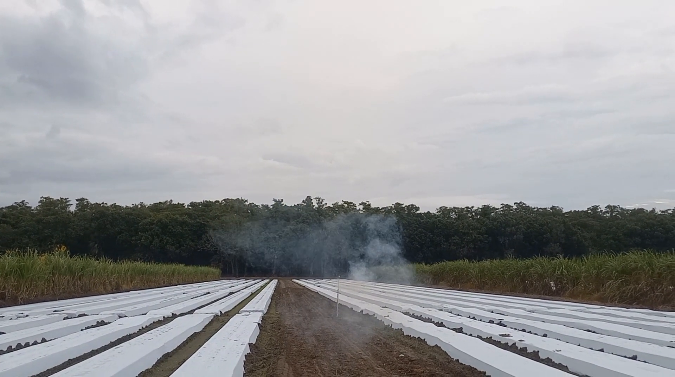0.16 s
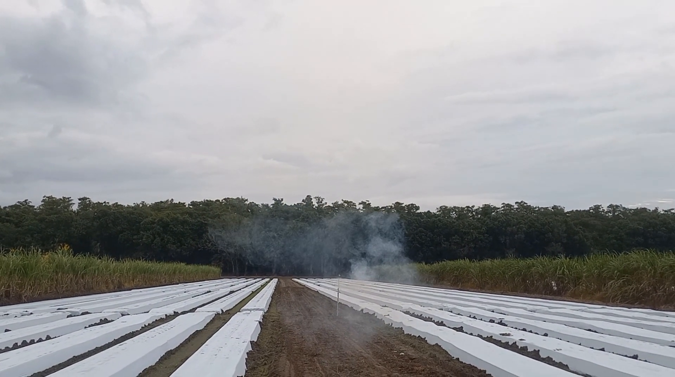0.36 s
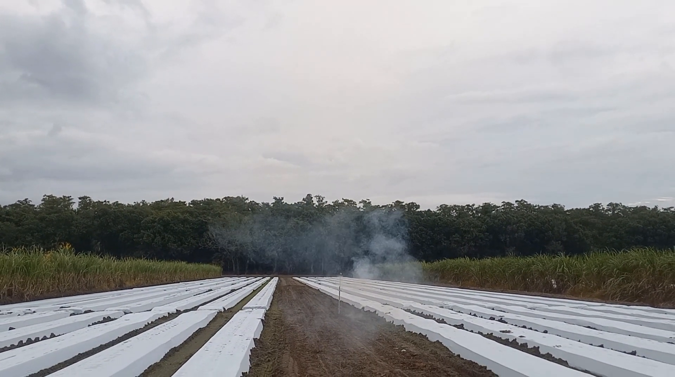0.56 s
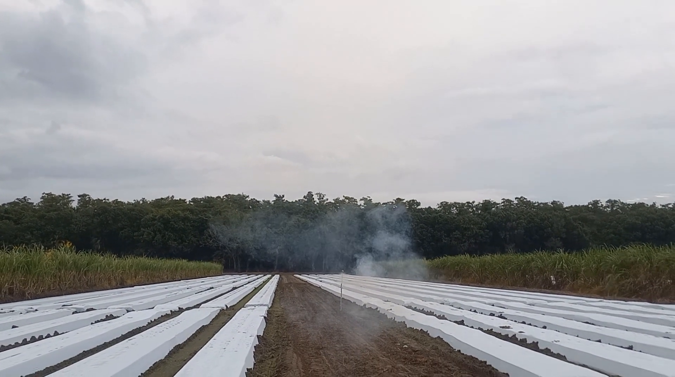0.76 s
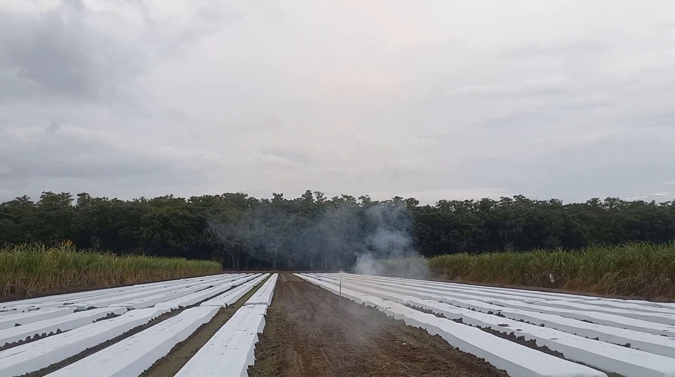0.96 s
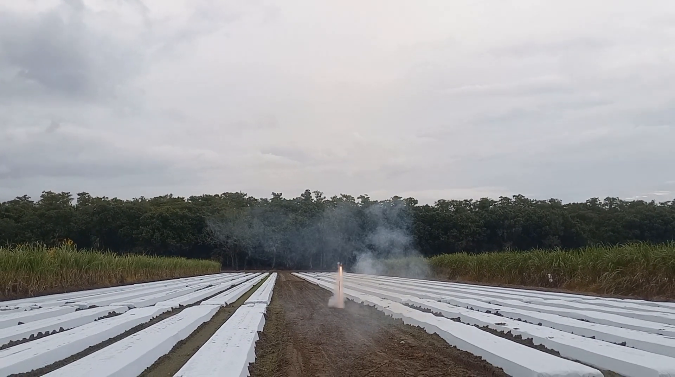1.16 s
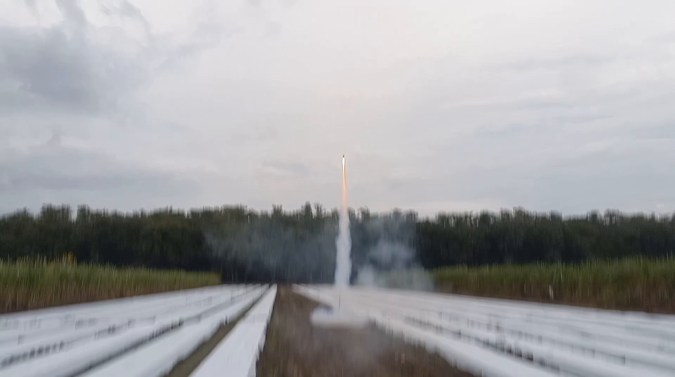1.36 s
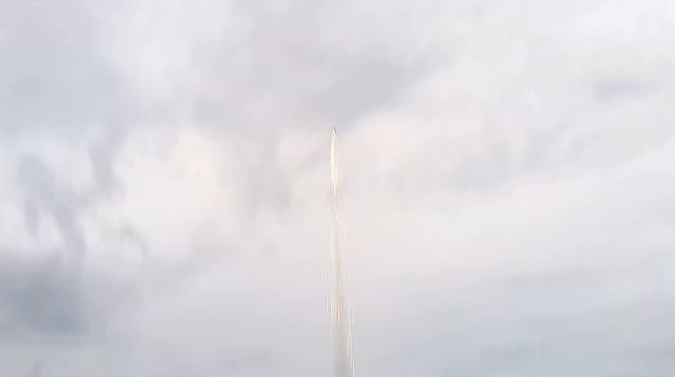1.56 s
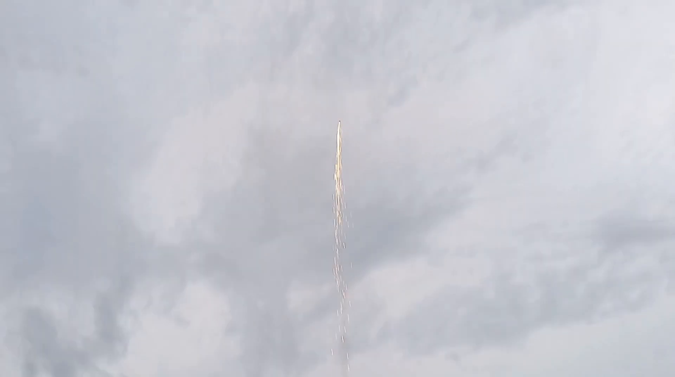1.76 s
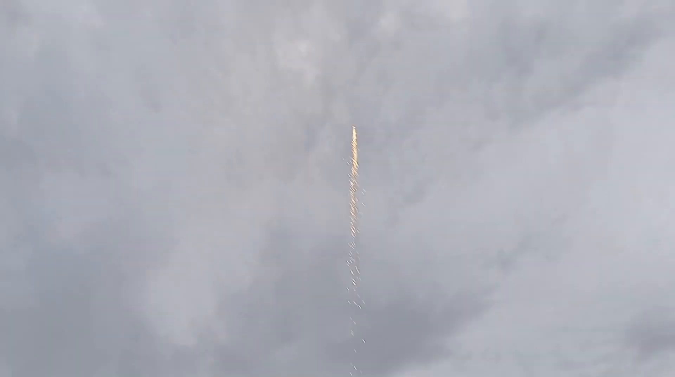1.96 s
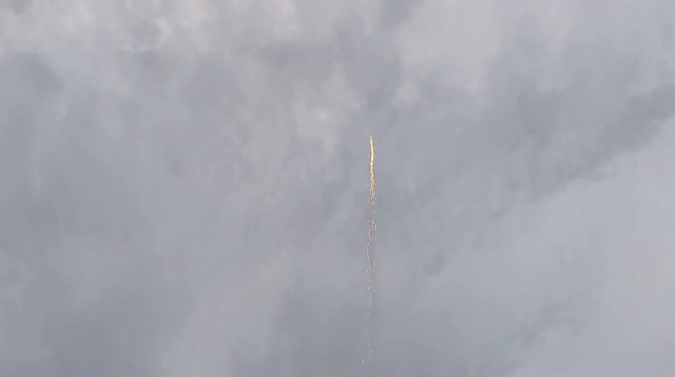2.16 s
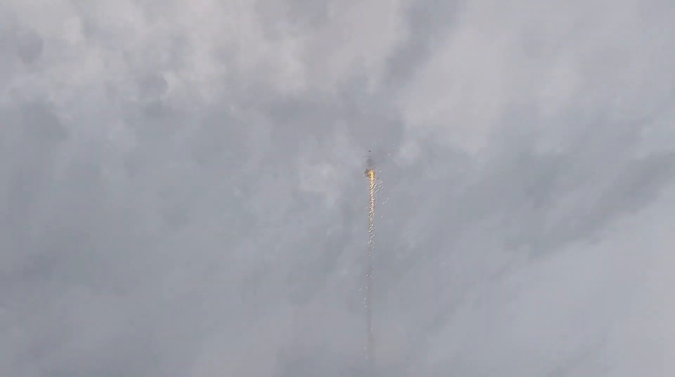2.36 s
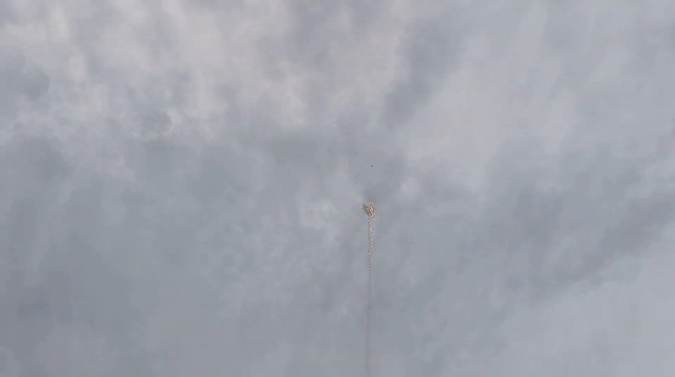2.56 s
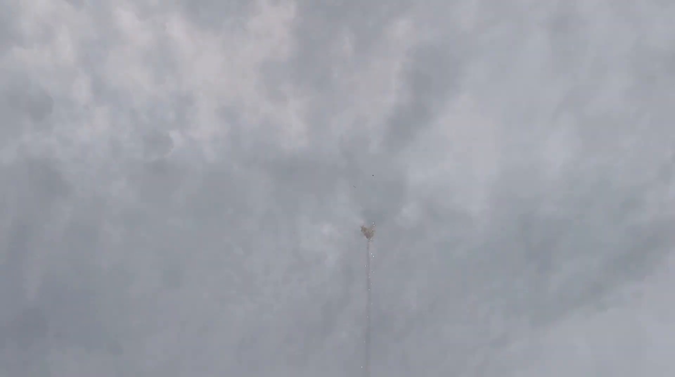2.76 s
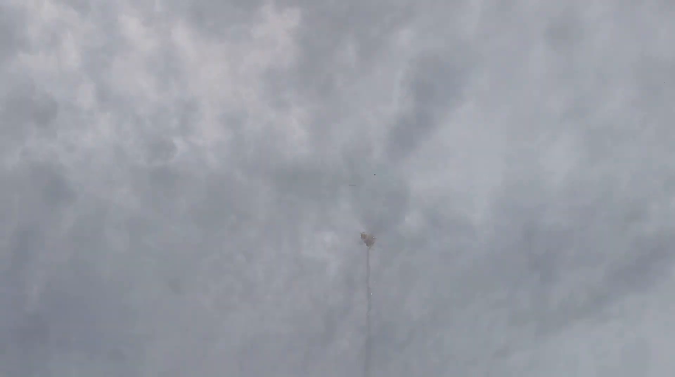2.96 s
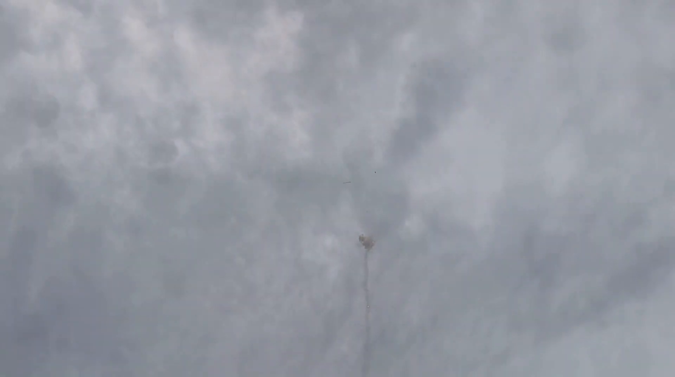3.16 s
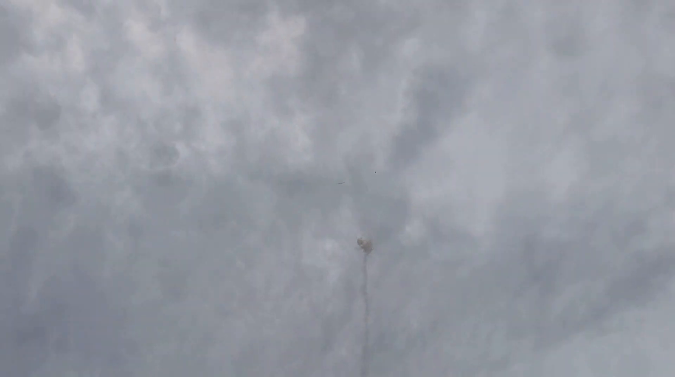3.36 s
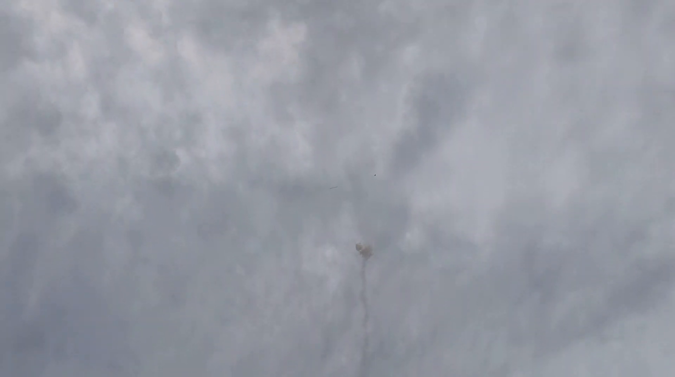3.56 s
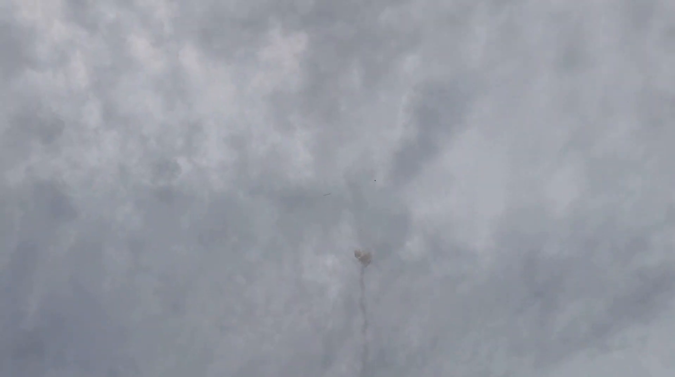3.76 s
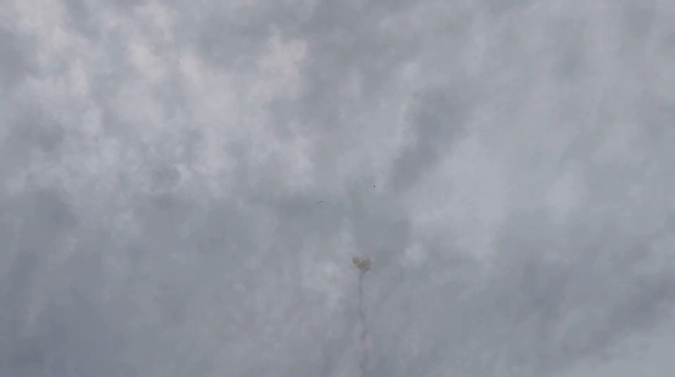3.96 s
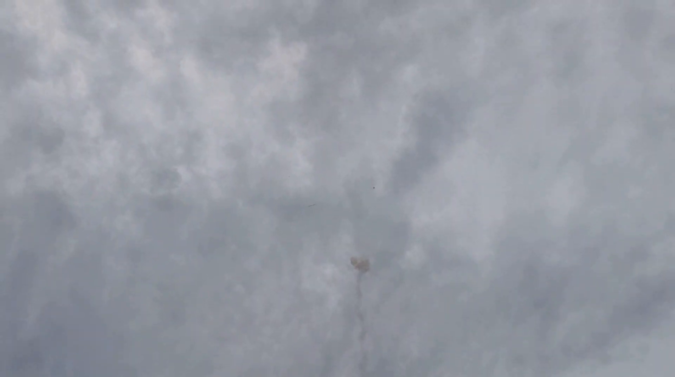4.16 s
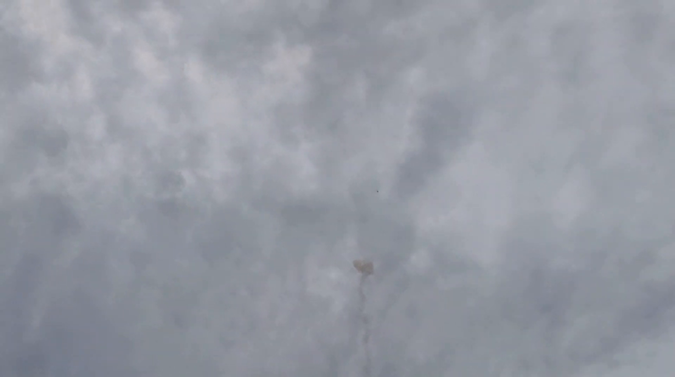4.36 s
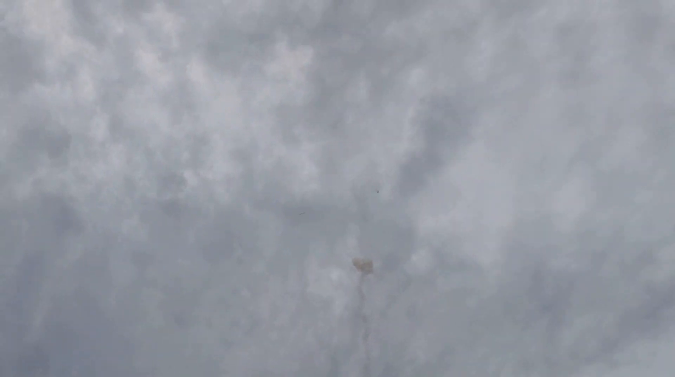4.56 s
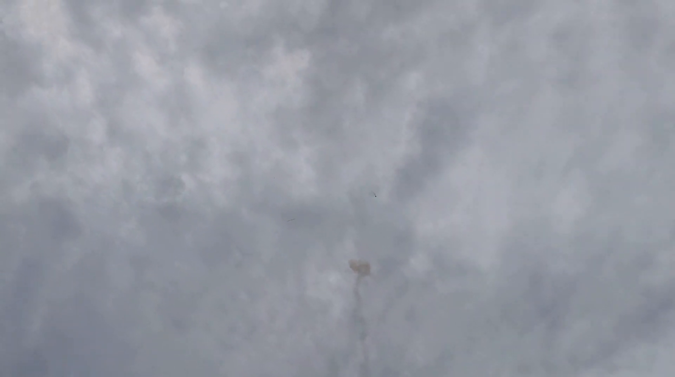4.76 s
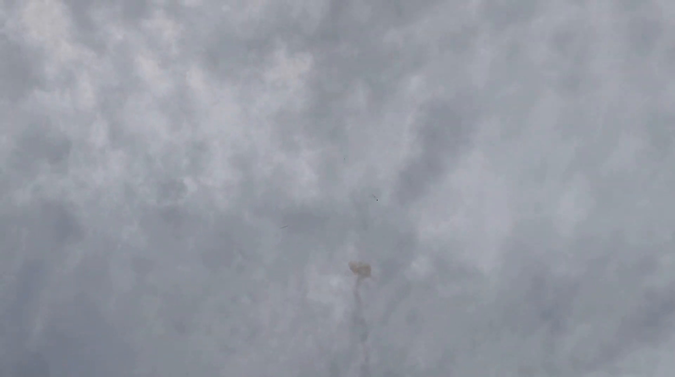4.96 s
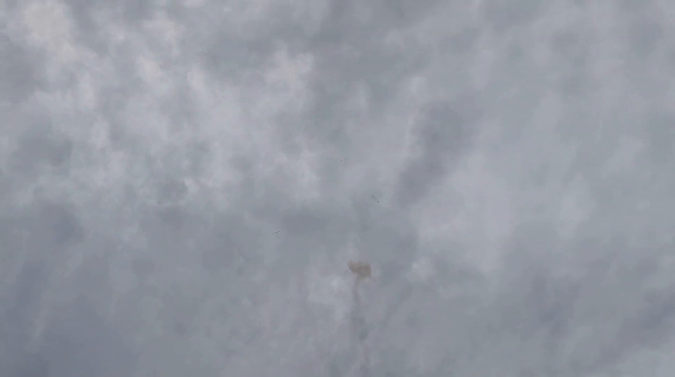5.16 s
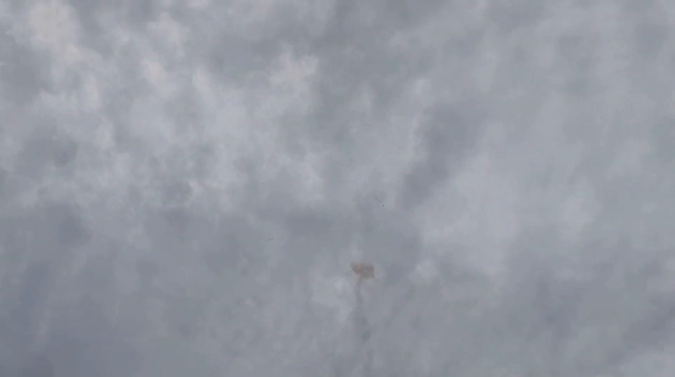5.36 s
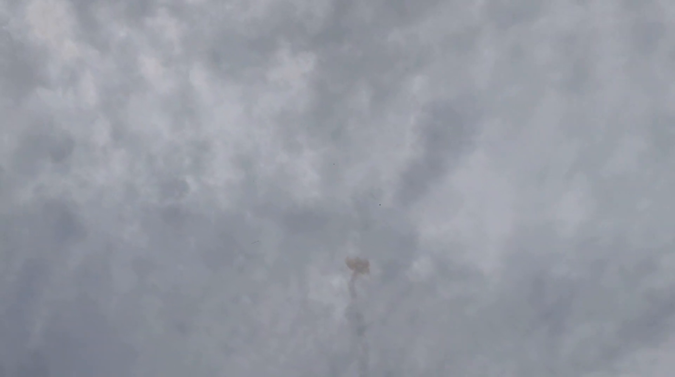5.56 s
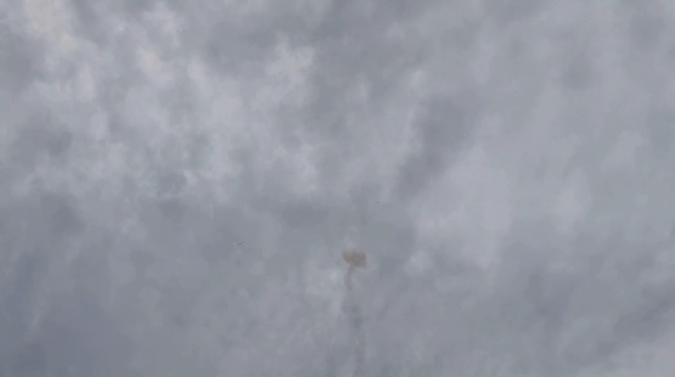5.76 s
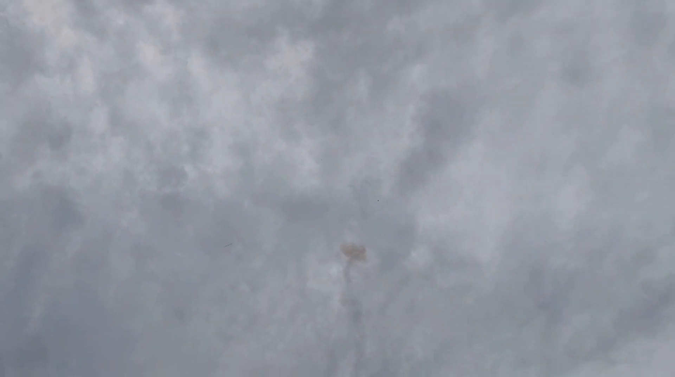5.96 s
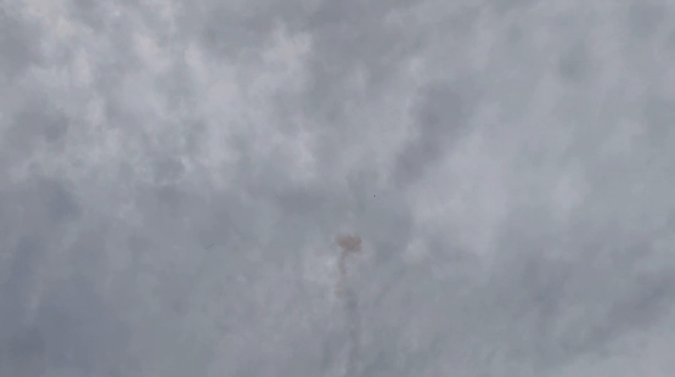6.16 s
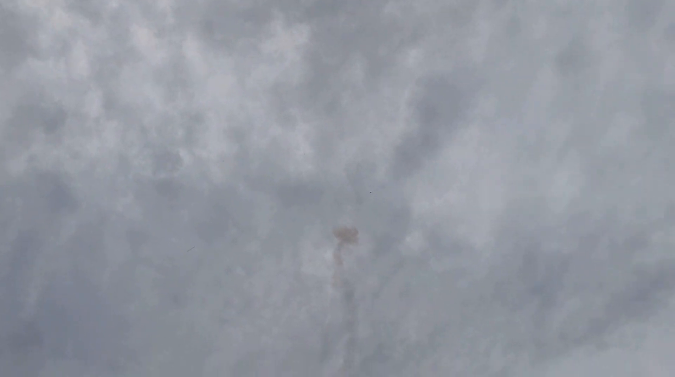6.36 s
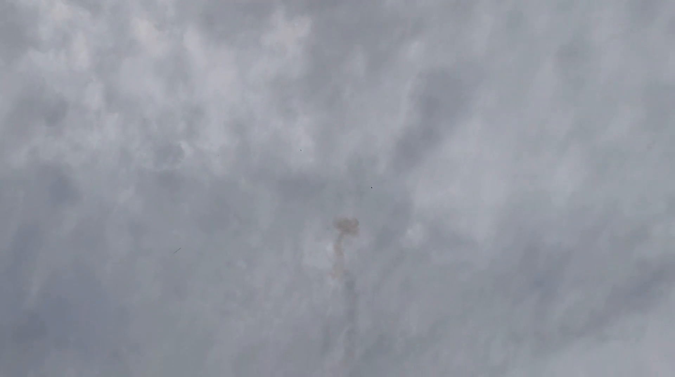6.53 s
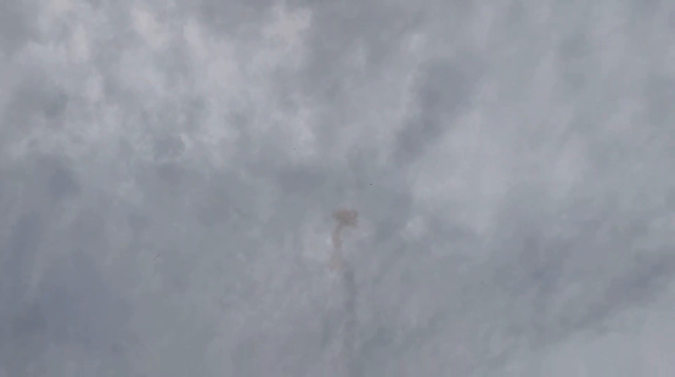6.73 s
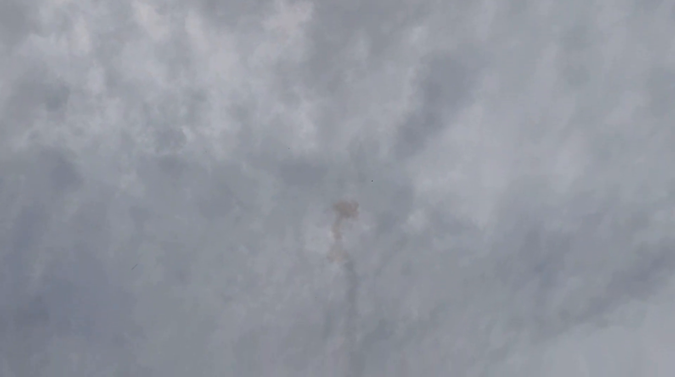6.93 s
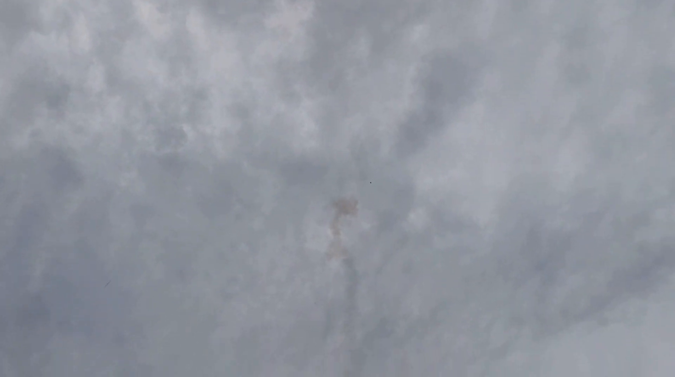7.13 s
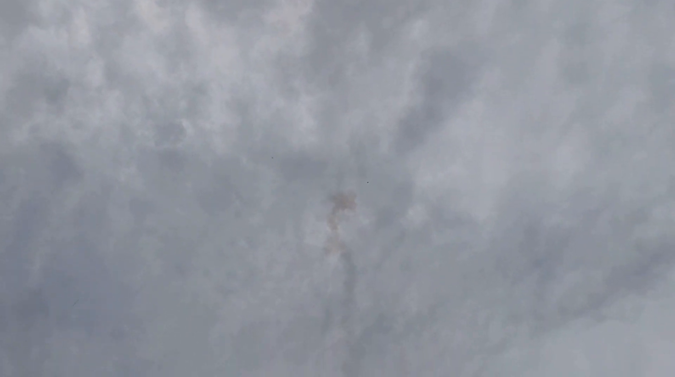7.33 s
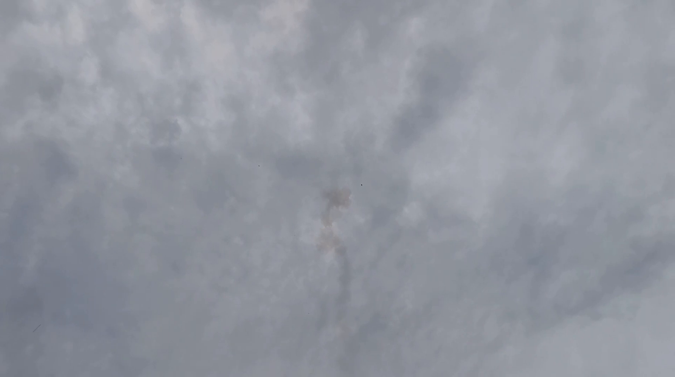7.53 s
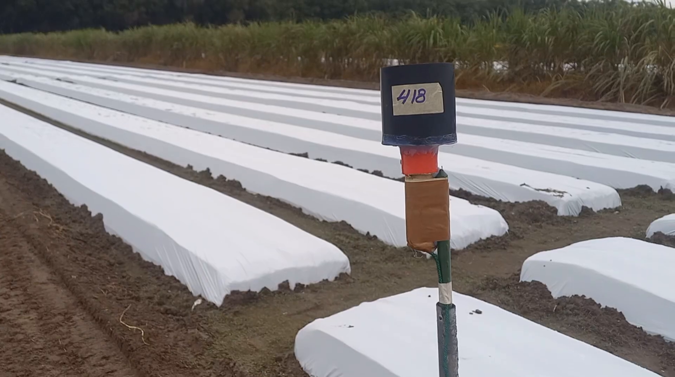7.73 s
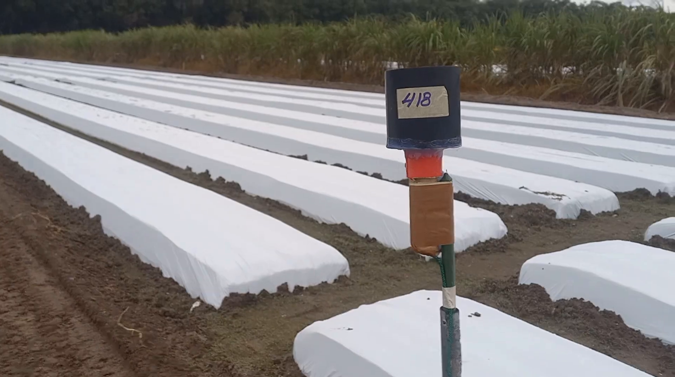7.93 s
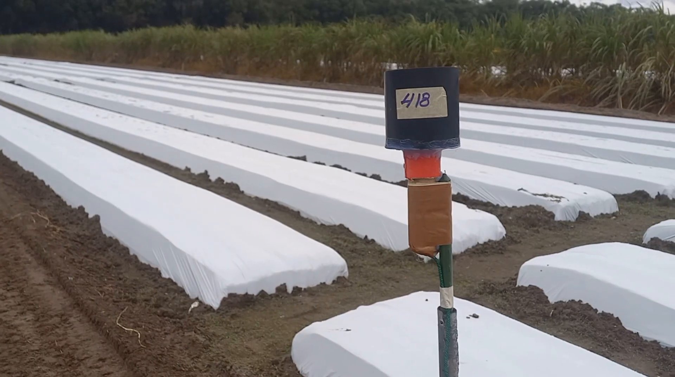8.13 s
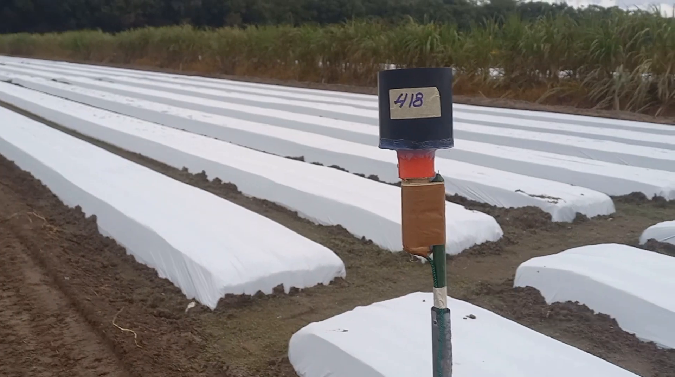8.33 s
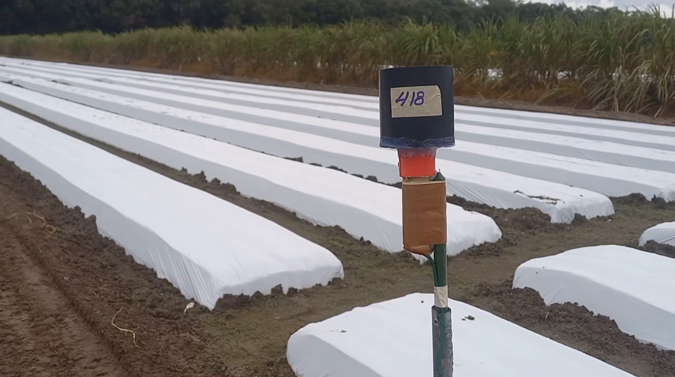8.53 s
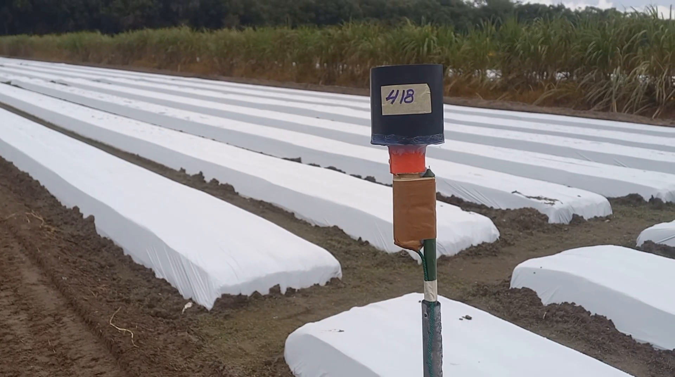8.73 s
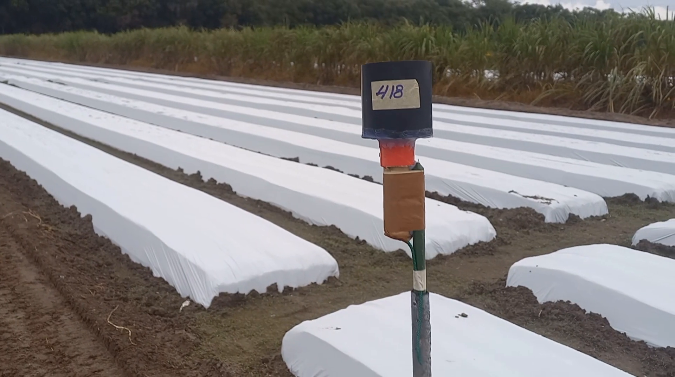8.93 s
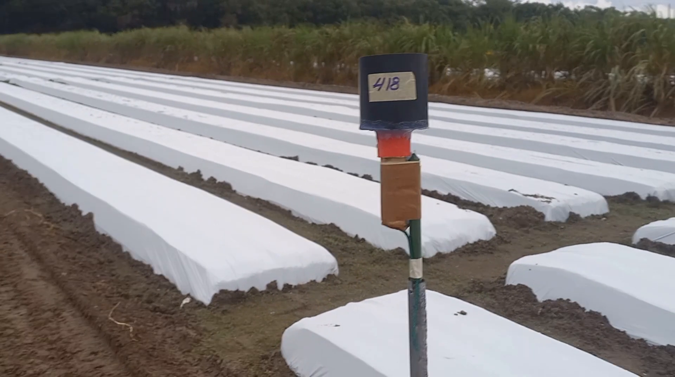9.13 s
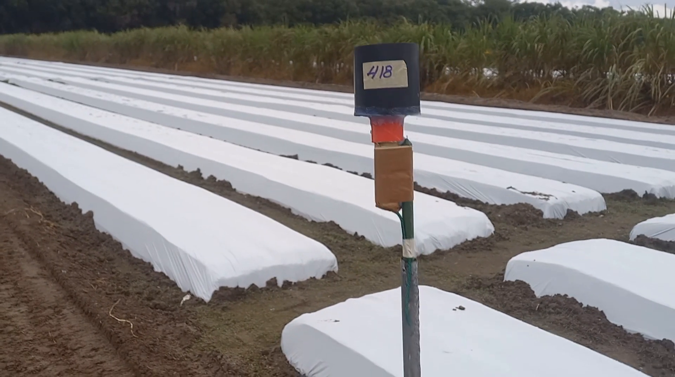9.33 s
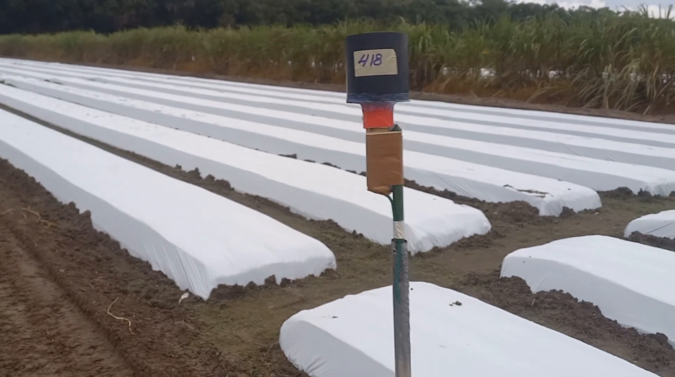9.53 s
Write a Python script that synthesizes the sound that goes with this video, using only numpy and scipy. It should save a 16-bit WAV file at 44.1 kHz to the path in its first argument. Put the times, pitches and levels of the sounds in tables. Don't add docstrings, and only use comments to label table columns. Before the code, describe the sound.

Open field, handheld camera microphone: a far engine drones faintly under hissing crop. A small rocket suddenly ignites with a loud rough roar, squeal and bark, then climbs with a piercing whistle that pulses and fades. A hard bang follows, its echoes clustering and rolling back from trees. The background swells up again, a click or two, a distant pop, then a brief silence and a quieter view of the same drone.

```python
import sys
import numpy as np
from scipy import signal
from scipy.fft import rfft, irfft, next_fast_len
from scipy.io import wavfile
from scipy.ndimage import uniform_filter1d, map_coordinates

SR = 44100
rng = np.random.default_rng(int(sys.argv[2]) if len(sys.argv) > 2 else 0)


def voltage_ratio(level):
    return 10 ** (np.asarray(level, float) / 20)


def inscribe(sig):
    pcm = np.round(np.clip(np.atleast_2d(sig).T, -1, 1) * 32767)
    wavfile.write(sys.argv[1], SR, pcm.astype(np.int16))


N = 422919
T = np.arange(N) / SR
TOP_HZ = 15870

# multiple, level_db
ENGINE_LINES = [(1, 2.5), (2, 1.5), (3, -8.5), (4, -15.5), (5, -8), (6, -9), (7, -7.5), (8, -11), (9, -3.5),
                (10, -11.5), (11, -8.5), (12, -6), (17, -13), (18, -27.5)]
# from_s, turn_in_s, to_s, turn_out_s
HEADINGS = [
    (-1, 1, 1.6, .2),
    (1.6, .2, 7.7, .001),
    (7.7, .001, 11, 1),
]
# body_over_drone_db, hiss_over_drone_db, treble_likeness (0-1)
HEADING_MIX = [
    (10, -10, 0.5),
    (11, -8, 1),
    (11, -5.5, 0.74),
]
# freq_hz, density_db (per Hz)
DRONE_BODY = [
    [(29, -38.5), (50, -5.5), (97, 0), (150, -8), (426, -13), (663, -12), (1310, -11.5), (2200, -19.5),
     (5320, -28), (6000, -40.5), (13200, -120)],
    [(29, -31.5), (50, 0.5), (107, -6), (188, -7), (418, -5.5), (1340, -7), (3040, -18.5), (3490, -28),
     (4180, -25.5), (6000, -37), (13200, -120)],
    [(29, -28), (50, -5), (329, -6.5), (378, -11), (1310, -15.5), (1800, -11.5), (2450, -17.5),
     (2950, -23.5), (3900, -26.5), (5110, -30), (6000, -36), (13200, -120)],
]
# freq_hz, density_db (per Hz)
CROP_HISS = [
    [(2940, -25), (5000, -12.5), (6190, -7.5), (6960, -4), (9280, -9.5), (11100, -3.5), (16000, -10)],
    [(2940, -27.5), (5000, -3), (5430, -10), (7000, -7.5), (7900, -13.5), (8670, -9.5), (10400, -13.5),
     (11700, -14.5), (14100, -10), (16000, -26)],
    [(2940, -28.5), (5000, -4.5), (6100, -16.5), (6800, -6.5), (8380, -6.5), (9280, -7), (14000, -10),
     (16000, -11)],
]
# freq_hz, left_minus_right_db
HEADING_LEAN = [
    [(60, 2.5), (150, 4), (380, 6), (950, 0.5), (2380, 1), (5980, 6.5), (15000, -8)],
    [(60, 4.5), (180, 0), (550, 2.5), (1650, -1), (4970, 4.5), (15000, -8.5)],
    [(60, -9), (180, 0), (550, 0.5), (1650, -3.5), (4970, 1), (15000, -10.5)],
]
# freq_hz, left_lead_rad
HEADING_LEAD = [
    [(0, -2), (2500, 1.8), (3530, 4), (5250, 4.5), (7150, 12.5), (10800, 10.5), (11700, 15), (16300, 20.5)],
    [(0, 0), (3530, 4), (4220, 6.5), (7410, 8.5), (9130, 12.5), (10800, 19), (16300, 34)],
    [(0, -1), (1380, -1.5), (6120, -6), (7410, -9.5), (8350, -10.5), (9990, -17), (16300, -23)],
]
# freq_hz, shared_part (0-1)
PORT_LIKENESS = [(60, 1), (300, 0.99), (1000, 0.75), (2500, 0.87), (8000, 0.38), (15000, 0.67)]
# start_s, drone_db, treble_db
CAMERA_GAIN = [(0, -50, 1), (1.15, -49.5, -1), (1.3, -62, 2.5), (2.3, -64.5, 1), (2.6, -62.5, 6.5),
               (3.6, -60.5, -10), (4.45, -51, -1.5), (5.3, -48, -2), (5.7, -47.5, -2.5), (7.69, -48, -3),
               (7.72, -57, 0), (9.1, -56, 2), (9.25, -56.5, -6.5), (9.59, -54.5, -9.5)]

# start_s, peak_db, centre_hz, t60_s, left_minus_right_db
BODY_CLICKS = [(.14, -34.5, 10070, 0.0099, 4.5), (1.1598, -20.5, 1780, 0.0036, 0),
               (1.85, -41.5, 12500, .0049, -4), (2.01, -34.5, 12440, .006, -2),
               (5.294, -36.5, 10900, 0.036, -8.5), (5.301, -23.5, 2440, 0.0093, -13),
               (5.301, -28.5, 12480, .008, -2.5), (5.7079, -15, 12400, 0.0028, -7.5),
               (5.7079, -29.5, 2700, .006, -7), (5.708, -30.5, 900, .003, -4),
               (7.5318, -28.5, 2170, 0.001, -13.5)]

# start_s, level_db
THRUST = [
    (1.1, -72),
    (1.15, -53.5),
    (1.18, -28),
    (1.21, -24),
    (1.535, -22.5),
    (1.57, -30.5),
    (1.63, -43),
    (1.9, -60),
    (2.455, -86),
]
# start_s, length_s, level_db
GUSTS = [
    (1.306, .012, -29),
    (1.45, .003, -24),
    (1.465, .008, -21.5),
    (1.485, 0.058, -23),
]
# freq_hz, density_db (per Hz)
BUFFET_SPECTRUM = [(24, -52), (40, -24.5), (92, -2), (187, -9), (235, -7.5), (408, -6.5), (700, -13.5),
                   (910, -41), (1540, -120)]
ROAR_SPECTRUM = [(290, -20.5), (500, -12.5), (761, -6.5), (1310, -4), (1900, -2), (3300, -4), (4650, -2.5),
                 (7000, -15.5), (9100, -34.5), (15400, -120)]
SIZZLE_SPECTRUM = [(3240, -32.5), (5500, -10), (5960, -15), (7000, -11.5), (8330, -3), (9530, -6),
                   (11300, -0.5), (14900, -6.5), (16000, -11)]
# freq_hz, left_minus_right_db
EXHAUST_LEAN = [(60, 26), (200, 20), (380, 15), (700, 1.5), (1290, 0.5), (2380, 8), (4400, 2.5),
                (8120, -1.5), (15000, -4)]
# freq_hz, left_lead_rad
ROAR_PHASE = [(0, -1), (2400, 1), (3000, 5), (4600, 4.5), (8000, 3.5)]

# start_s, pitch_hz, octave_db
SQUEAL_GLIDE = [(1.162, 2165, -40.5), (1.176, 2178, -17), (1.179, 2180, -26.5), (1.186, 2181, -17),
                (1.197, 2140, -28.5), (1.212, 1990, -20), (1.226, 1862, -24), (1.233, 1880, -18.5),
                (1.238, 1850, -39)]
# start_s, centre_hz, level_db, t60_s
BARKS = [
    (1.187, 1470, -12.5, 0.053),
    (1.199, 1846, -17, 0.19),
    (1.262, 1500, -30.5, 0.13),
]

# start_s, pitch_hz
WHISTLE_PITCH = [
    (1.575, 1535),
    (1.645, 1665),
    (1.72, 1722),
    (1.85, 1765),
    (2.155, 1725),
    (2.225, 1860),
    (2.333, 1850),
    (2.375, 1772),
    (2.46, 1755),
]
# start_s, next_crest_db, ground_share (0-1)
RAY_FADES = [(1.569, -2, 0.7), (1.591, -4.5, 1), (1.616, -5.5, 0.64), (1.643, -4.5, 0.7), (1.67, -6, 1),
             (1.699, -5.5, 0.5), (1.744, -6, 0.77), (1.793, -7, 0.96), (1.835, -7.5, 0.7), (1.909, -9, 0.6),
             (1.921, -17, 1), (1.941, -8, 0.76), (1.971, -9.5, 0.77), (2.007, -22, 1), (2.02, -10, 0.3),
             (2.124, -14, 0.28), (2.166, -13.5, 0.4), (2.209, -16, 1), (2.241, -16.5, 0.02),
             (2.259, -20.5, 1), (2.275, -23, 0.2), (2.29, -21, 0.6), (2.306, -17, 0.9), (2.326, -20.5, 0.4),
             (2.351, -13, 1), (2.383, -14.5, 0.8), (2.395, -13.5, 1), (2.462, -16.5, 0.6)]
# multiple, start_db, loss_db (after 1 s of climb), loss_bend
OVERTONES = [(2, -24, 33, .9), (3, -27, 44, .5), (4, -44, 44, 1.2), (5, -43, 56, .9), (6, -46, 60, .9),
             (7, -50, 60, .9)]

# start_s, level_db, ring_hz (negative starts
BANGS = [(2.473, -13, 695, 0.68), (2.475, 4, 270, 0.6), (2.4838, 4, -800, 0.37), (2.485, 2.5, 280.5, 0.66),
         (2.4908, 2, 160, 0.5), (2.5001, -19, 259.5, 0.69), (2.5109, -10, 248, 2.3),
         (2.517, -16.5, 1900, 8), (2.524, -15.5, 1620, 4), (2.5285, -17, 1300, 1), (2.5251, -5, 279, 0.9),
         (2.531, -10, 261, 0.6), (2.5346, -3.5, -260, 1), (2.544, -9, 260.5, 0.8), (2.5556, -10, 199, 0.9),
         (2.582, -9, 333, 1.5), (2.598, -12, 267, 1), (2.6056, -7, 261.5, 0.83), (2.6373, -11, 222, 0.8),
         (2.652, -13, 222.5, 0.83), (2.6268, -10, 1060, 0.42), (2.66, -11, 200, 0.84),
         (2.765, -13, 274, 1.6), (4.35, -18, 360, 1.3), (7.5321, -3, 853, 0.48), (7.533, -10, -330, 0.34),
         (1.303, -17, 98.5, 1.2)]
# ring_hz, level_db
CRACK_LEVEL = [(95, -60), (160, -30), (300, -14), (1000, -20.5)]
# start_s, rumble_db
ROLLING = [
    (2.487, -16),
    (2.65, -24.5),
    (2.7, -27),
    (3.05, -30),
    (3.35, -33.5),
    (3.68, -39),
    (4.3, -35.5),
    (5, -35),
    (6.6, -48),
]
# freq_hz, density_db (per Hz)
RUMBLE_SPECTRUM = [(29, -56), (50, -16.5), (130, -1), (177, -11), (284, -2), (428, -2.5), (571, -25.5),
                   (650, -38), (840, -45), (1430, -120)]
RUSH_SPECTRUM = [(290, -29), (500, -0.5), (1070, -8), (1700, -10.5), (2140, -12), (2800, -15.5),
                 (4500, -21.5), (5850, -37), (9900, -120)]
AIR_SPECTRUM = [(2060, -33.5), (3500, -1.5), (3950, -2.5), (7000, -6.5), (9380, -9), (11300, -8.5),
                (14400, -16.5), (16000, -24)]
THUD_SPECTRUM = [(50, -29.5), (110, 2.5), (170, -6), (300, -59)]
# freq_hz, density_db (per Hz)
LATE_ECHO = [(1600, -41.0), (1840, -6.5), (1950, -8.0), (2050, -8), (2200, -48.0), (3000, -120)]
EARLY_ECHO = [(1700, -38), (1950, 1), (2300, -13.5), (2800, -20.5), (4000, -120)]


def unit(x):
    return x / np.sqrt(np.mean(x ** 2) + 1e-20)


def along(points, hz):
    f, v = np.transpose(points)
    return np.interp(np.log(hz + 1), np.log(f + 1), v)


def curves(rows, rest=-120):
    s, *cols = np.transpose(rows)
    return [np.interp(T, s, c, rest, rest) for c in cols]


def blip(start, length, db, rise_db_s, fall_db_s):
    return db - rise_db_s * np.maximum(start - T, 0) - fall_db_s * np.maximum(T - start - length, 0)


def bump(centre_s, width_s):
    return np.exp(-((T - centre_s) / width_s) ** 2)


def wobble(rate):
    return map_coordinates(rng.standard_normal(int(N * rate / SR) + 4), [T * rate])


def phase(hz):
    return 2 * np.pi * np.cumsum(hz) / SR


def filtered(x, response):
    m = next_fast_len(x.shape[-1] + 8192)
    return irfft(rfft(x, m) * response(np.fft.rfftfreq(m, 1 / SR)), m)[..., :x.shape[-1]]


def sides(db):
    return voltage_ratio(np.array([db, -db]) / 2)


def add_at(out, start_s, sound):
    out[:, round(start_s * SR):][:, :sound.shape[1]] += sound


def stereo_noise(spectrum, lead, lean=((1, 0),), grit_db=0, alike=1):
    noise = rng.standard_normal((3, N)) * voltage_ratio(grit_db * wobble(900))

    def share(hz):
        return np.clip(along(PORT_LIKENESS, hz) * alike ** np.minimum(hz / 2000, 1), 0, 1)

    def ahead(hz):
        return np.exp(.5j * np.interp(hz, *np.transpose(lead)) * np.array([[1], [-1]]))

    def colour(hz):
        return voltage_ratio(along(spectrum, hz)) * sides(along(lean, hz))

    shared = filtered(noise[:1], lambda hz: colour(hz) * ahead(hz) * np.sqrt(share(hz)))
    own = filtered(noise[1:], lambda hz: colour(hz) * np.sqrt(1 - share(hz)))
    pair = shared + own
    return pair / np.std(pair.mean(0))


def field():
    firing_hz = 47.55
    hiss_follows = 0.44
    drone_db, treble_db = curves(CAMERA_GAIN)
    turn = phase(firing_hz + 0.082 * wobble(1))
    lines = sum(voltage_ratio(db + 2.1 * wobble(6)) * np.sin(k * turn + rng.uniform(0, 2 * np.pi))
                for k, db in ENGINE_LINES)
    throb = 1 + 0.16 * np.cos(turn)
    out = voltage_ratio(drone_db + 6.5) * lines[None]
    views = zip(HEADINGS, HEADING_MIX, DRONE_BODY, CROP_HISS, HEADING_LEAD, HEADING_LEAN)
    for (start, rise, end, fall), (body_db, hiss_db, alike), body, hiss, lead, lean in views:
        ramp = np.minimum((T - start) / rise, (end - T) / fall)
        facing = np.sqrt(np.clip(.5 + ramp, 0, 1))
        noise = voltage_ratio(drone_db + body_db + .25 * wobble(14)) * stereo_noise(body, lead, lean, 0.5, alike)
        leaves = stereo_noise(hiss, lead, lean, 1, alike)
        top = filtered(leaves, lambda f: 1 / (1 + (11500 / (f + 1)) ** 12))
        leaves = leaves + (voltage_ratio(treble_db) - 1) * top
        out = out + facing * throb * (noise + voltage_ratio(drone_db + hiss_db + hiss_follows * treble_db) * leaves)
    return out


def camera_clicks():
    out, t = np.zeros((2, N)), T[:SR // 20]
    for s, db, hz, t60, pan_db in BODY_CLICKS:
        width_hz = 0.69 * hz * (hz / 10000) ** 0.34
        snap = rng.standard_normal(len(t)) + 1.3 * rng.standard_normal((2, len(t)))
        snap *= voltage_ratio(-60 * t / t60)
        snap[:, 0] += 8
        snap = filtered(snap, lambda f: (1j * f * width_hz / (hz * hz - f * f + 1j * f * width_hz)) ** 2)
        add_at(out, s, voltage_ratio(db) * sides(pan_db)[:, None] * snap / np.abs(snap).max())
    return out


def jet():
    full_db, roar_db, buffet_db = -20.5, -21, -40.5
    roar_follows = 0.65
    thrust_db = curves(THRUST)[0] - full_db
    surge, lead = wobble(70), [(0, -0.5), (16000, 1.5)]
    gusts = sum(voltage_ratio(blip(*row, 1999.5, 1201)) for row in GUSTS)
    blast = (voltage_ratio(buffet_db + thrust_db) + gusts) * voltage_ratio(3.4 * wobble(60.33))
    buffet = blast * stereo_noise(BUFFET_SPECTRUM, lead, EXHAUST_LEAN, alike=1e-5)
    roar_gain = voltage_ratio(roar_db + roar_follows * thrust_db + 1.4 * surge)
    roar = roar_gain * stereo_noise(ROAR_SPECTRUM, ROAR_PHASE, EXHAUST_LEAN, alike=.75)
    sizzle_gain = voltage_ratio(full_db + thrust_db + 2.5 + 1.0 * surge)
    sizzle = sizzle_gain * stereo_noise(SIZZLE_SPECTRUM, lead, EXHAUST_LEAN, grit_db=1.0, alike=0.37)
    return buffet + roar + sizzle


def squeal():
    catch_s, catch_length_s = 1.178, 0.007
    hz, octave_db = curves(SQUEAL_GLIDE)
    first_db = blip(catch_s, catch_length_s, -12, 7499, 7499)
    upper_db = blip(catch_s - .004, catch_length_s + .004, -33, 1800, 1800)
    turn = phase(hz + 12 * wobble(320))
    out = voltage_ratio(first_db) * np.sin(turn)
    out += voltage_ratio(octave_db + 6 + 2.5 * wobble(200)) * np.sin(2 * turn)
    out += voltage_ratio(upper_db) * (np.sin(3 * turn) + np.sin(4 * turn) + np.sin(5 * turn))
    for s, tube_hz, db, t60 in BARKS:
        gas = unit(filtered(rng.standard_normal(N), lambda f: 1 / (1 + ((f - tube_hz) / 300) ** 2)))
        out += (T > s) * voltage_ratio(db - 60 * np.abs(T - s) / t60) * gas
    return np.array([out, np.roll(out, 1)]) * sides(1.5)[:, None]


def whistle():
    end_s, left_db = 2.468, 2.5
    s, crest_db, ground = np.transpose(RAY_FADES)
    crest = s + np.minimum(0.44 * np.diff(s, append=s[-1] + .015), .028)
    climb = np.maximum(T - s[0], 0)
    turn = phase(np.interp(T, *np.transpose(WHISTLE_PITCH)) + 12 * wobble(150))
    waves = np.interp(T, np.ravel([s, crest], "F"), np.arange(2 * len(s)) / 2)
    gap = 2 * np.pi * (waves + np.array([[.08], [-.08]]))
    share = np.clip(np.interp(T, s, ground), 0, 1)
    port = np.array([[.3], [-.3]])

    def rays(k, ground_share, back=0):
        direct = k * (turn + port - back)
        return (np.sin(direct) - ground_share * np.sin(direct + k * gap)) / (1 + ground_share)

    out = voltage_ratio(np.interp(T, crest, crest_db) + 0.31 * wobble(67)) * rays(1, share, gap / 2)
    third_dip_db = 12 * bump(1.75, .045)
    for k, db, loss_db, bend in OVERTONES:
        level_db = db - loss_db * climb ** bend - third_dip_db * (k == 3)
        out += voltage_ratio(level_db + k * 1.3 * wobble(70)) * rays(k, .35)
    out *= sides(left_db + 1.5 * wobble(27))
    out *= np.clip((T - 1.5705) / 0.0023, 0, 1) * np.clip((end_s - T) / .004, 0, 1)
    leaves = rng.standard_normal((2, SR // 4)) * voltage_ratio(-60 * T[:SR // 4] / 0.32)
    scattered = signal.fftconvolve(out, leaves / np.linalg.norm(leaves[0]), axes=1)[:, :N]
    halo = filtered(rng.standard_normal((2, N)), lambda f: 1 / (1 + (f / 260) ** 4))
    halo_db = -20.5 + 10 * bump(1.93, .025)
    return out * (1 + voltage_ratio(halo_db) * unit(halo)) + voltage_ratio(-19) * scattered


def rolling_echo():
    burst_s, burst_db = ROLLING[0]
    rumble_db, = curves(ROLLING)
    trees_s, rise_s, fall_s = 3.15, 0.017, .4
    trees_db = 10 * np.exp(-np.maximum((trees_s - T) / rise_s, (T - trees_s) / fall_s))
    rush_db = -28 + 0.99 * (rumble_db - burst_db) + 0.47 * trees_db
    air_db = blip(burst_s, 0, -42, 9000, 32) + trees_db
    echo_db = blip(burst_s, 0, -40, 9000, 18)
    peal, lead = wobble(25), [(0, 0), (16000, 14.5)]
    out = voltage_ratio(rumble_db - 2.0 + 1.0 * peal) * stereo_noise(RUMBLE_SPECTRUM, lead, alike=.15)
    rush_gain = voltage_ratio(rush_db + .6 * peal + 1.2 * wobble(80))
    out += rush_gain * stereo_noise(RUSH_SPECTRUM, lead, grit_db=0.5, alike=0.29)
    out += voltage_ratio(air_db + .4 * peal) * stereo_noise(AIR_SPECTRUM, lead, grit_db=1.0, alike=0.14)
    out += voltage_ratio(echo_db - 3) * stereo_noise(LATE_ECHO, lead, alike=0.63)
    out += voltage_ratio(blip(burst_s, 0.19, -23.5, 9000, 260)) * stereo_noise(THUD_SPECTRUM, lead)
    out += voltage_ratio(blip(1.98, 0.16, -45.5, 60, 40)) * stereo_noise(EARLY_ECHO, lead, alike=.5)
    for hz in [1870, 1945, 2010]:
        turn = phase(hz + 28 * wobble(14))
        out += voltage_ratio(echo_db - 7 + 5 * wobble(13)) * np.sin(turn + rng.uniform(0, 2, (2, 1)))
    return out


def burst():
    shock_db, crack_loss_db_s = 14.5, 12
    pop_s, pop_left_db = 6.6, -9.5
    first_s = BANGS[0][0]
    out, t = np.zeros((2, N)), T[:SR // 20]
    for (s, db, hz, cycles), pan_db in zip(BANGS, rng.normal(0, 2, len(BANGS))):
        crack_db = along(CRACK_LEVEL, abs(hz)) - crack_loss_db_s * (s - first_s) + shock_db * (s == first_s)
        pan_db = pop_left_db if s > pop_s else pan_db
        ring = np.sin(2 * np.pi * hz * t) * np.exp(-t * abs(hz) / cycles)
        push = voltage_ratio(db - 2.0) * ring * (1 - np.exp(-t / 0.0001))
        grains = filtered(rng.standard_normal((2, len(t))), lambda f: 1 / (1 + f / 3000))
        crack = voltage_ratio(crack_db - 60 * t / 0.01) * grains
        add_at(out, s, sides(pan_db)[:, None] * (push + crack))
    return out


def thinned(x):
    from_s, from_hz, to_hz = 5.32, 2400, TOP_HZ - 2000
    hz, s, z = signal.stft(np.array([x[0] + x[1], x[0] - x[1]]) / 2, SR, nperseg=2048)
    power = uniform_filter1d(np.abs(z) ** 2, size=12, axis=1)
    power = uniform_filter1d(power, size=3, axis=2)
    band_db = np.repeat(10 * np.log10(power[:, 4::8] + 1e-20), 8, axis=1)
    band_db = np.pad(band_db, ((0, 0), (0, len(hz) - band_db.shape[1]), (0, 0)), "edge")
    over_db = band_db - uniform_filter1d(band_db, size=140, axis=1)
    limit_db = -5.2 + .24 * np.minimum(hz / 1000, 8)
    weak = over_db < limit_db[:, None]
    weak &= ((hz > from_hz) & (hz < to_hz))[:, None] & (s > from_s)
    mid, side = signal.istft(z * ~weak, SR, nperseg=2048)[1][:, :N]
    return np.array([mid + side, mid - side])


def scene():
    return field() + camera_clicks() + jet() + squeal() + whistle() + rolling_echo() + burst()


def top_cut(x):
    return signal.sosfilt(signal.butter(12, 16680, fs=SR, output="sos"), x)


def record(dry):
    gap_start_s, gap_end_s = 7.6865, 7.7195
    wet = filtered(dry, lambda f: (1j * f / (40 + 1j * f)) ** 3 * (f < TOP_HZ))
    wet = wet / (1 + np.abs(wet / .92) ** 6) ** (1 / 6)
    gate = np.clip(np.maximum((gap_start_s - T) / .002, (T - gap_end_s) / 0.0031), 0, 1)
    return top_cut(thinned(wet) * gate)


dry = scene()
out = record(dry)
inscribe(out)
```